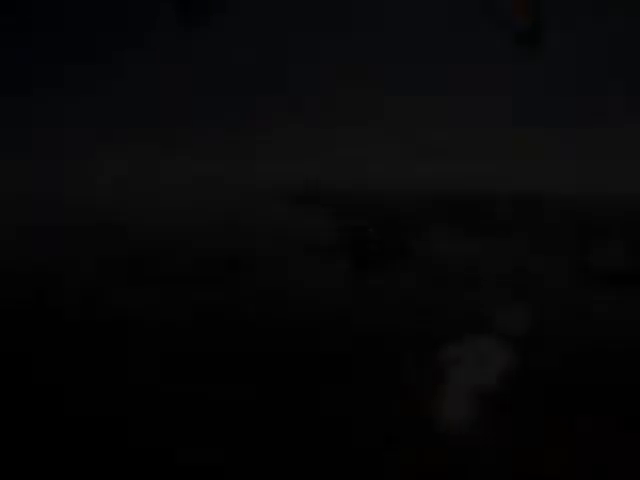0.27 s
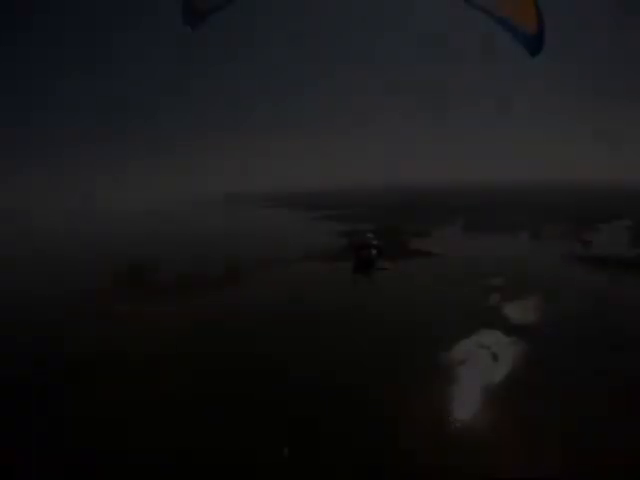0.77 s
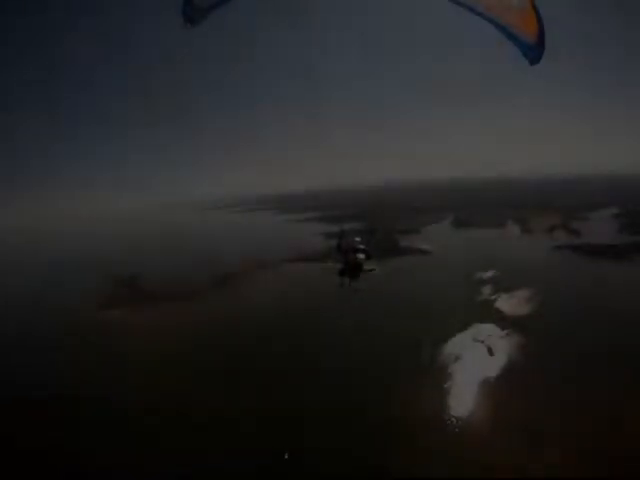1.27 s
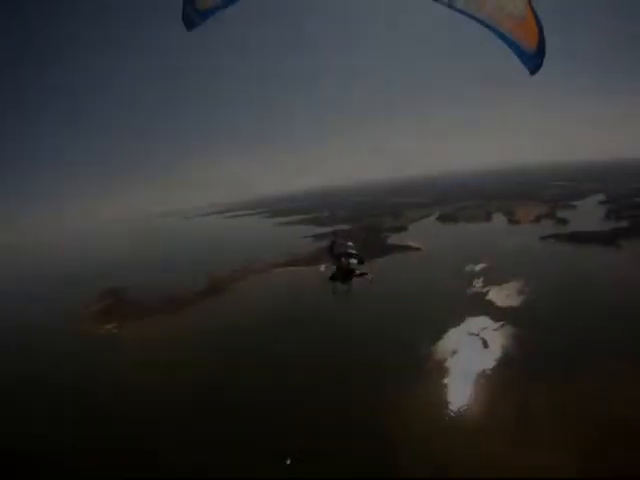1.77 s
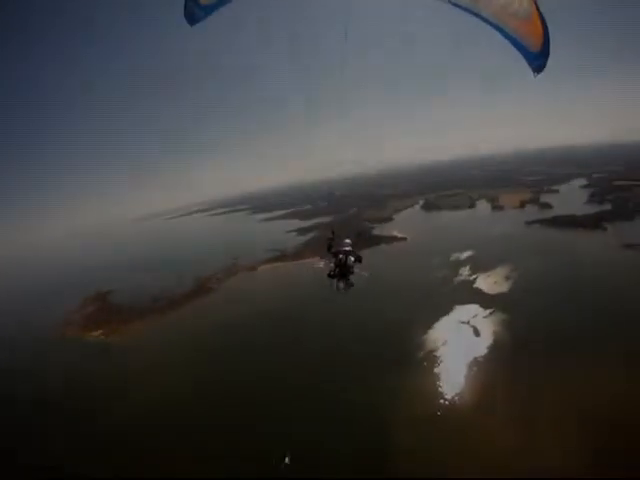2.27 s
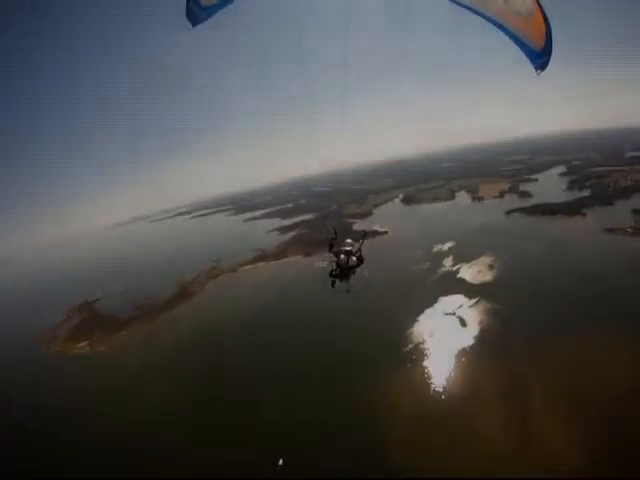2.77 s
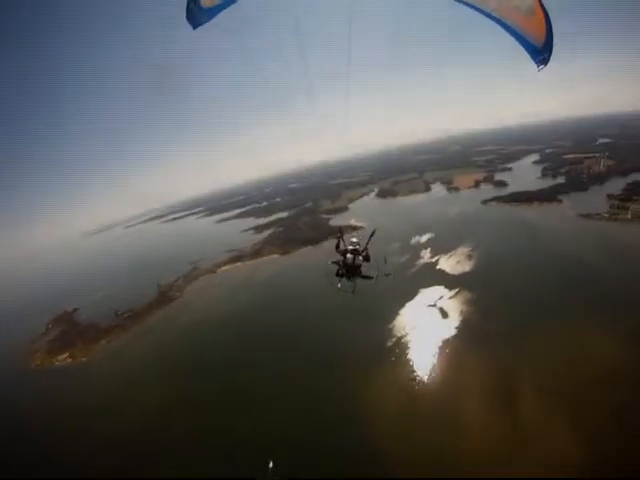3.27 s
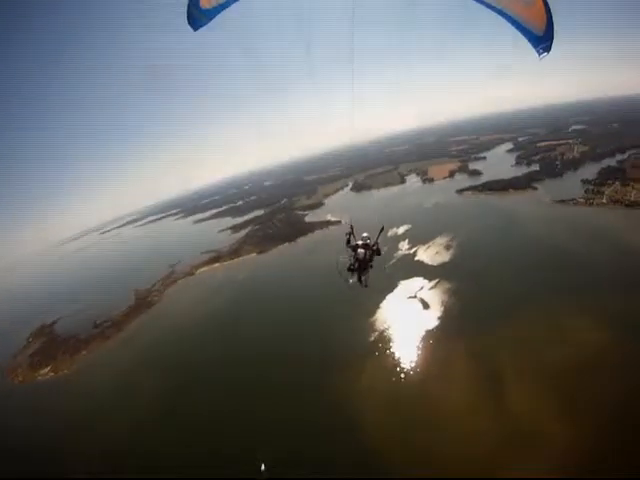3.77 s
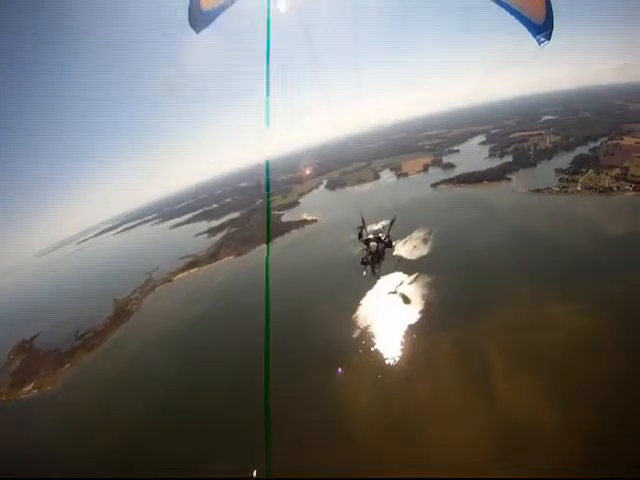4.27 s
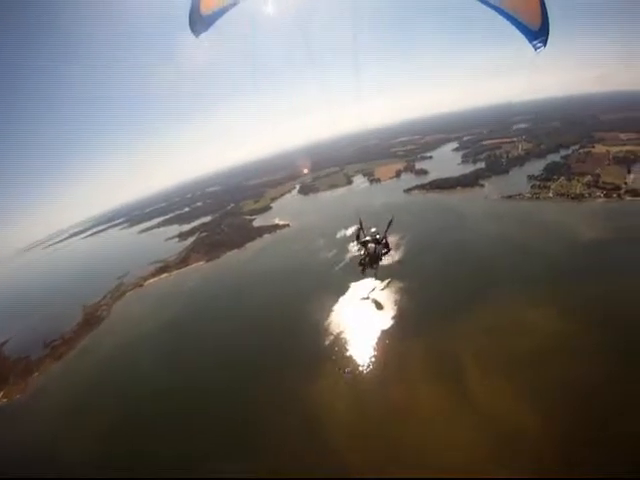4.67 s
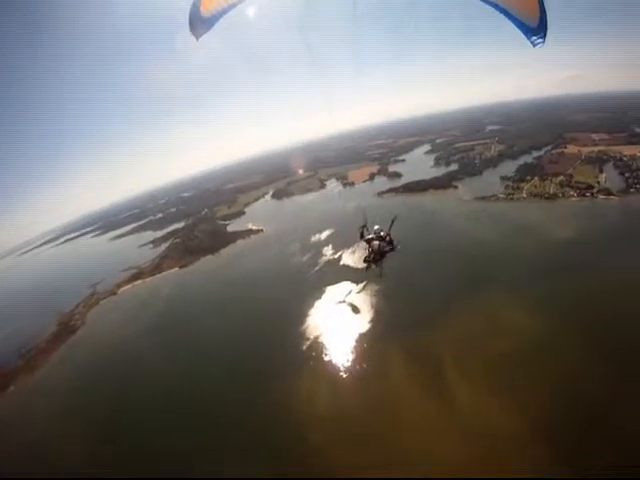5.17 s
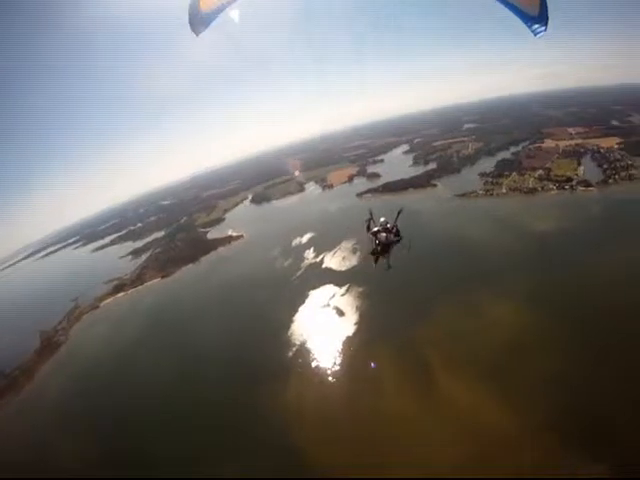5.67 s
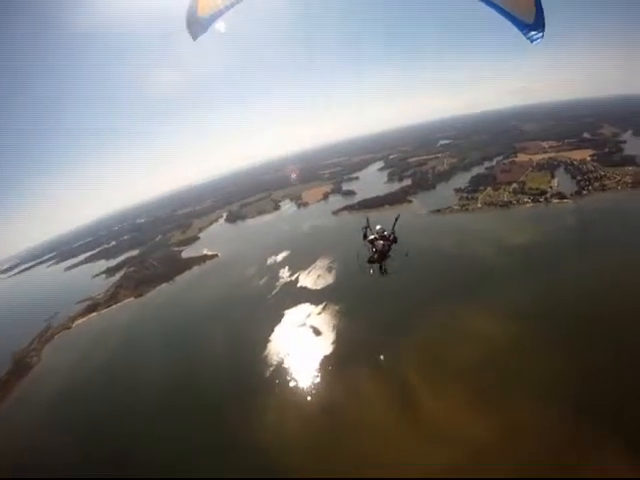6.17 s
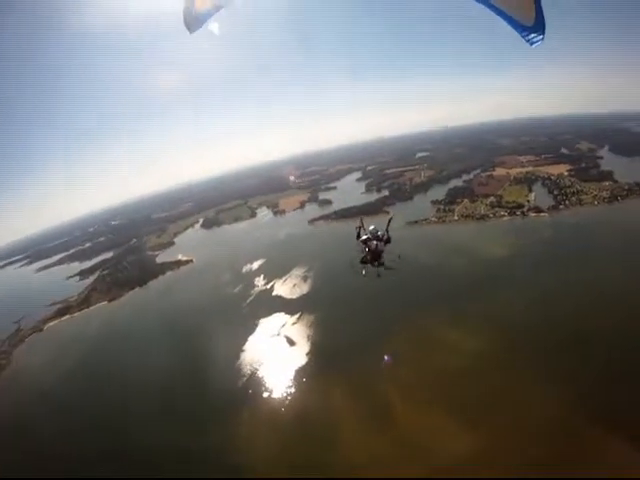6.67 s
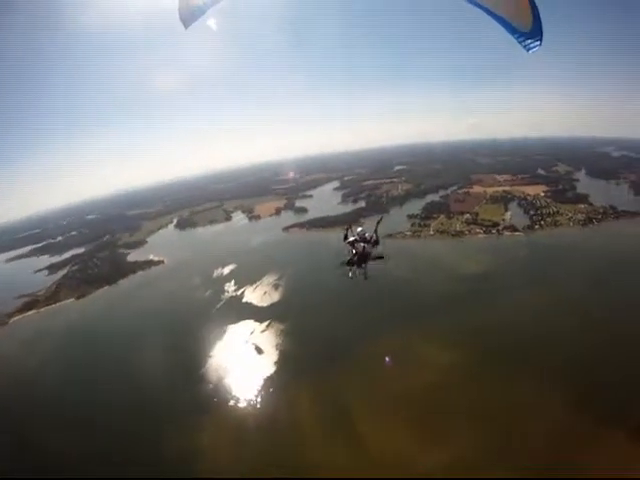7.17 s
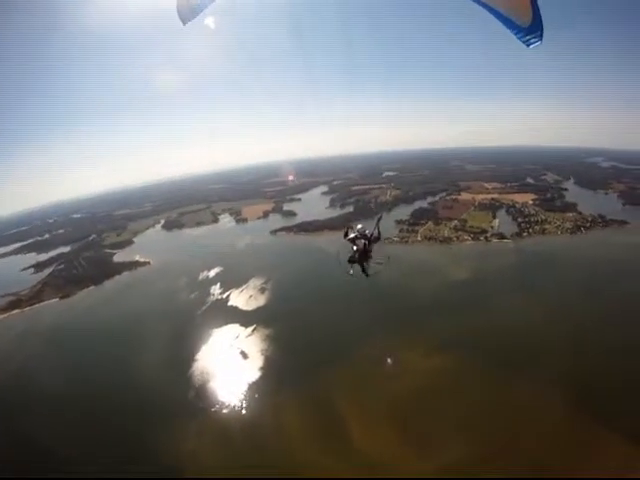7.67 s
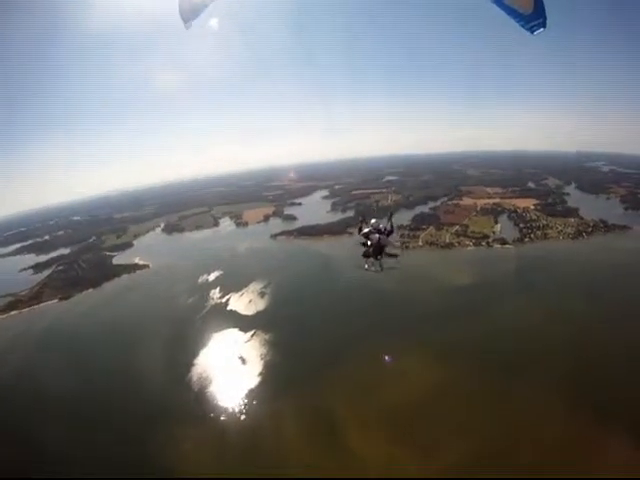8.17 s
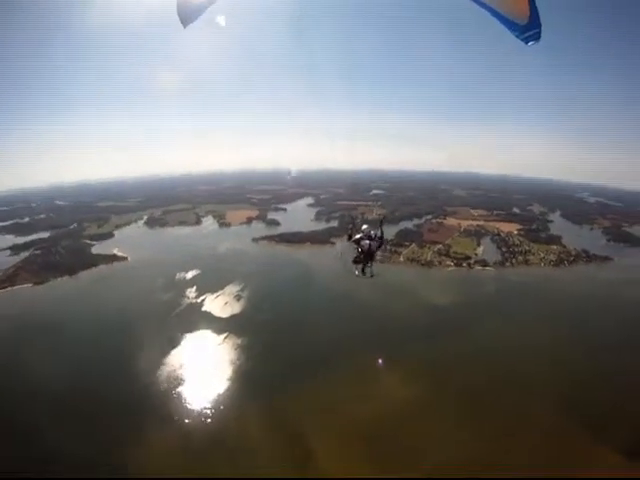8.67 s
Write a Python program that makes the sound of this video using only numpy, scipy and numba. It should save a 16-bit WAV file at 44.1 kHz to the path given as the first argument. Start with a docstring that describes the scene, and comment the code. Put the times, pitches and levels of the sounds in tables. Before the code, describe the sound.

From silence, wind and engine fade in gradually, reaching full level at about 3.7 s. A loud, deep wind roar shudders and flutters against a small camera microphone trailing behind a paramotor pilot over water, with thin rushing hiss above. Beneath it a two-stroke engine and propeller drone as a rough, throbbing buzz; its pitch sinks from 1.6 to 2.9 s, partly recovers by 3.7 s, then creeps up slightly. A breathy lower whistle is present early and fades by about 3 s, flaring briefly near 4.9 s. A higher whistle wavers, dips around 2.8, 3.2 and 3.8 s, rises and strengthens from 5 to 7.5 s, and falters repeatedly from 6.3 to 8.3 s. Buffeting thumps strike irregularly, notably at 4.7, 6.1 and 8.4 s, ducking the sound. Tiny dry ticks come near 3.1, 4.2, 4.7 and 8.2 s. Wind eases slightly after 7.2 s. Gritty, glassy treble; no echo.

```python
"""Wind roars and hisses on the microphone of a small camera that trails behind a paramotor pilot, high over water.
The wind is coloured noise shaken by turbulence; eddies strike as pressure bumps, and two whistles are narrow
resonances whose pitch or strength follows the airspeed. Under them the two-stroke exhaust and the propeller
drone as rows of harmonics, easing off once and partly recovering. A few dry clicks are short noise bursts.
Loud peaks make the gain duck, coarse sampling adds a glassy fizz, and the sound fades in."""
import sys
import numpy as np
from scipy import signal
from scipy.fft import rfft, irfft
from scipy.io import wavfile
from numba import njit

SR = 44100
rng = np.random.default_rng(int(sys.argv[2]) if len(sys.argv) > 2 else 0)


def to_wav(s):
    """Save 16-bit WAV."""
    ch = np.atleast_2d(s).T  # columns
    pcm = np.round(np.clip(ch, -1, 1) * 32767)  # PCM
    wavfile.write(sys.argv[1], SR, pcm.astype(np.int16))


N = 393372
TIME = np.arange(N) / SR  # seconds


def undb(db):
    """Level law: an amplitude ratio is ten to the power of decibels over twenty."""
    return 10 ** (np.asarray(db) / 20)


def unit(x):
    """Normalisation: scale to a root mean square of 1."""
    return x / np.sqrt(np.mean(np.abs(x) ** 2))


def curve(table):
    """Linear interpolation in time through rows of (seconds, value)."""
    seconds, values = np.transpose(table)
    return np.interp(TIME, seconds, values)


def swell(centre_s, length_s):
    """Gaussian rise and fall of height 1; its length is the full width at half height."""
    return 2 ** -(2 * (TIME - centre_s) / length_s) ** 2


def walk(rate_hz):
    """Low-passed white noise: a smooth random course of rms 1, its spectrum halved in amplitude at the rate."""
    hz = np.fft.rfftfreq(N, 1 / SR)
    white = rfft(rng.standard_normal(N))
    return unit(irfft(white / (1 + (hz / rate_hz) ** 2), N))


def noise(spectrum):
    """Spectral shaping: white noise weighted by (Hz, dB) points on a log frequency axis, scaled to rms 1."""
    hz, db = np.transpose(spectrum)
    bins_hz = np.fft.rfftfreq(N, 1 / SR)
    gain = undb(np.interp(np.log(bins_hz + 1), np.log(hz), db))
    white = rfft(rng.standard_normal(N))
    return unit(irfft(white * gain, N))


def turning(hz):
    """Phase in radians is the running integral of angular frequency."""
    return 2 * np.pi * np.cumsum(hz) / SR


def lowpass(x, hz):
    """Elliptic filtering: a steep low-pass with 0.2 dB ripple and an 80 dB stop band."""
    return signal.sosfilt(signal.ellip(10, .2, 80, hz, fs=SR, output="sos"), x)


def wind(crank, blade):
    """Turbulent pressure noise: a deep roar and a thin rush over the housing share one modulation."""
    # Each row: frequency in Hz, relative spectral level in dB.
    roar_spectrum = [(10, -18), (20, -17), (32, 1), (70, 0), (140, -2), (300, -3.5), (420, -6), (520, -5),
                     (620, -13), (750, -22), (950, -31.5), (1200, -37.5), (1400, -49), (2500, -69)]
    # Each row: frequency in Hz, relative spectral level in dB.
    rush_spectrum = [(900, -13.5), (1400, -11), (1900, -5), (2200, 0.5), (2800, 1), (3150, -7),
                     (3550, -15.5), (3850, -8.5), (4300, -14), (4800, -13), (5100, -16), (5400, -20),
                     (6000, -35)]
    # Slow drift of the whole wind. Each row: time in seconds, level in dB.
    wind_level = [(0, 0), (5.5, 0.2), (7.2, 0), (8.3, -2.5)]
    turbulence = walk(36) + 0.43 * walk(4.2)
    # the air throbs with each propeller turn, each blade and each firing
    throb = 0.51 * np.cos(blade / 2) + .5 * np.cos(blade) + 0.62 * np.cos(crank)
    roar_db = -14.5 + 1.46 * turbulence + 0.56 * throb
    rush_db = -40.0 + 0.39 * turbulence + throb
    roar = noise(roar_spectrum) * undb(roar_db)
    rush = noise(rush_spectrum) * undb(rush_db)
    return (roar + rush) * undb(curve(wind_level))


def sing(hz, width_hz):
    """Narrow-band resonance fed by turbulence: two random quadrature amplitudes on a moving pitch, rms 1."""
    phase = turning(hz)
    return walk(width_hz) * np.cos(phase) + walk(width_hz) * np.sin(phase)


def whistles():
    """Vortex shedding at an edge: airspeed sets the pitch and which of two whistles speaks."""
    # Airspeed, told by the edge whistle. Each row: time in seconds, pitch in Hz before the lulls.
    airspeed = [(0.3, 2370), (0.9, 2340), (1.4, 2316), (1.9, 2294), (2.4, 2363), (2.7, 2357), (3.0, 2369),
                (3.9, 2388), (4.4, 2397), (5.0, 2427), (5.55, 2464), (6.0, 2463), (6.35, 2500),
                (7.55, 2482), (7.8, 2459), (8.1, 2453), (8.55, 2468), (8.85, 2367)]
    # Brief lulls in the airflow. Each row: centre in seconds, length in seconds, sag of the edge
    # whistle in Hz, lift of the lower whistle in dB.
    lulls = [(2.79, .09, 93, -0.5), (3.211, 0.17, 69.8, 1), (3.774, .12, 64.4, -0.5),
             (4.944, 0.1713, 20, 15)]
    # The edge whistle falters. Each row: centre in seconds, length in seconds, depth in dB.
    falters = [(6.325, .12, 13.5), (6.9, 0.42, 8.5), (7.514, .07, 12), (7.79, 0.15, 11.5), (8.03, .18, 18),
               (8.343, .18, 4)]
    sag_hz = sum(sag * swell(s, length_s) for s, length_s, sag, _ in lulls)
    lift_db = sum(lift * swell(s, length_s) for s, length_s, _, lift in lulls)
    falter_db = sum(depth * swell(s, length_s) for s, length_s, depth in falters)
    hz = curve(airspeed) - sag_hz

    # the edge whistle swells as its pitch nears the resonance of a cavity in the housing
    cavity_hz, cavity_width_hz, cavity_gain_db = 2484, 71, 11.5
    cavity_db = cavity_gain_db * np.exp(-((hz - cavity_hz) / cavity_width_hz) ** 2)
    edge_db = -41 + cavity_db - falter_db + 0.97 * walk(2.2)
    edge = sing(hz + 11 * walk(17.6), width_hz=24) * undb(edge_db)

    # the lower, breathier whistle dies away in fast air, as the edge pitch passes a limit
    limit_hz, range_hz, drop_db = 2370, 40, 17
    too_fast = (1 + np.tanh((hz - limit_hz) / range_hz)) / 2
    lower_db = -36 - drop_db * too_fast + lift_db
    lower = sing(2184 + 18 * walk(4), width_hz=47) * undb(lower_db)

    # a faint overtone of the edge whistle gives way as the cavity takes over
    overtone = sing(2.06 * hz, width_hz=51) * undb(-56.5 - 0.24 * cavity_db)
    return edge + lower + overtone


def firing_rate():
    """Frequency modulation by the throttle: each move eases the firing rate along a sine-squared ramp."""
    # Ease off, open up again, creep up. Each row: start in seconds, length in seconds,
    # change of the firing rate in Hz.
    throttle = [(1.63, 1.29, -13.5), (2.72, 1.03, 8.3), (4.5, 4.8, 1.35)]
    start_hz = 80.55
    moves_hz = 0
    for start_s, length_s, change_hz in throttle:
        progress = np.clip((TIME - start_s) / length_s, 0, 1)
        moves_hz = moves_hz + change_hz * np.sin(np.pi / 2 * progress) ** 2
    wander = 1 + 0.00041 * walk(9.6)
    return (start_hz + moves_hz) * wander


def tones(phase, orders, flutter_db=1.5, housing_hz=522, housing_width_hz=24, housing_db=3):
    """Fourier series of a turning part: harmonics flutter in the wake and swell at the housing's resonance."""
    rate_hz = np.gradient(phase) * SR / (2 * np.pi)
    out = 0
    for order, db in orders:
        swell_db = housing_db * np.exp(-((order * rate_hz - housing_hz) / housing_width_hz) ** 2)
        level_db = db + swell_db + flutter_db * walk(2.9)
        out = out + undb(level_db) * np.sin(order * phase + rng.uniform(0, 2 * np.pi))
    return np.sqrt(2) * out  # makes the levels rms


def engine(crank, blade):
    """Periodic sources: exhaust pulses and passing blades each radiate their own harmonic row."""
    # Exhaust tones. Each row: multiple of the firing rate, level in dB before drift, flutter and swell.
    exhaust_tones = [(1, -37), (2, -43), (3, -43), (4, -43), (5, -44), (6, -34), (7, -31), (8, -39.5),
                     (9, -42.5), (10, -49), (11, -53), (12, -59), (14, -65)]
    # Propeller tones. Each row: multiple of the blade rate, level in dB before flutter and swell.
    propeller_tones = [(2, -38), (3, -37), (4, -35), (5, -34.5), (6, -36), (7, -32.5), (8, -31), (9, -33.5),
                       (10, -41.5), (11, -45), (12, -46), (13, -51)]
    # Slow drift of the exhaust drone. Each row: time in seconds, level in dB.
    exhaust_level = [(0.3, -2.5), (1.6, 2.5), (6.3, -1), (8.5, -3.5)]
    exhaust = tones(crank, exhaust_tones) * undb(curve(exhaust_level))
    propeller = tones(blade, propeller_tones)
    return exhaust + propeller


def buffets():
    """Eddy pressure pulse: a Gaussian bump on a wider, shallow suction, with a puff of hiss at its crest."""
    # Eddies that strike the microphone. Each row: time in seconds, signed height of the bump before
    # the suction is taken off, half length in seconds (where the bump falls to 1/e).
    eddies = [(1.779, .8, .0018), (3.340, .8, .0013), (4.073, .8, .0016), (4.693, 1.1, .0018),
              (5.413, .6, .0014), (5.475, -1.0, .0008), (5.764, .7, .0009), (5.920, -.8, .0009),
              (6.069, 1.2, .0016), (6.984, .8, .003), (8.227, .7, .002), (8.429, 1.1, .002)]
    out = np.zeros(N)
    hiss = undb(-49) * noise([(500, 1), (1200, 0), (3000, -3), (6000, -15)])
    for centre_s, peak, half_s in eddies:
        u = (TIME - centre_s) / half_s
        bump = np.exp(-u ** 2) * (1 + hiss)
        suction = 0.1 * np.exp(-(u / 4) ** 2)
        out += peak * (bump - suction)
    return out


def ticks():
    """Impulsive excitation: noise starts at once and decays exponentially, a tiny dry click."""
    # Small ticks on the housing. Each row: start in seconds, level at the onset in dB.
    clicks = [(3.0664, -30), (4.1638, -19), (4.660, -22), (8.2065, -29)]
    decay_s = 0.00048
    envelope = 0
    for start_s, db in clicks:
        decay = np.exp(-np.abs(TIME - start_s) / decay_s)
        envelope = envelope + undb(db) * (TIME >= start_s) * decay
    return envelope * noise([(800, -1), (3000, 3), (4500, 0), (5500, -7), (6500, -30)])


def scene():
    """Superposition: the sources add at the microphone, and open air gives no echo."""
    crank = turning(firing_rate())
    blade = crank / 1.2165  # firings per blade: a belt gears the two-bladed propeller down
    mix = wind(crank, blade) + whistles() + engine(crank, blade) + buffets() + ticks()
    return mix[None]


@njit
def follow(size, attack, release):
    """Peak detection: a one-pole envelope that rises fast and sinks slowly."""
    out, level = np.empty(len(size)), 0.
    for i in range(len(size)):
        level += (size[i] - level) * (attack if size[i] > level else release)
        out[i] = level
    return out


def gain_control(x, ceiling=0.43, attack_s=0.00096, release_s=0.11, lag_s=0.00167):
    """Delayed limiting: peaks over the ceiling turn the gain down a little late, and it recovers gradually."""
    envelope = follow(np.abs(x), 1 / (attack_s * SR), 1 / (release_s * SR))
    late = np.interp(TIME - lag_s, TIME, envelope)
    return x / np.maximum(late / ceiling, 1)


def sample_and_hold(x, hold_hz=12000):
    """Imaging: stair-step playback mirrors the sound around the sample rate, under a sinc response."""
    band = lowpass(x, hold_hz / 2)
    mirrored = band * (1 + 2 * np.cos(2 * np.pi * hold_hz * TIME))
    stair_response = np.sinc(np.fft.rfftfreq(N, 1 / SR) / hold_hz)
    return irfft(rfft(mirrored) * stair_response, N)


def record(dry):
    """Recording chain: gain control, overload clipping, coarse sampling, a slow fade-in and a treble cut."""
    # Start and end of the fade-in, in seconds.
    fade_s = (.028, 3.68)
    levelled = undb(0.07) * gain_control(dry[0])
    held = sample_and_hold(np.clip(levelled, -1, 1))
    faded = held * np.interp(TIME, fade_s, (0, 1))
    return lowpass(faded, 15250)[None]


dry = scene()
out = record(dry)
to_wav(out)
```